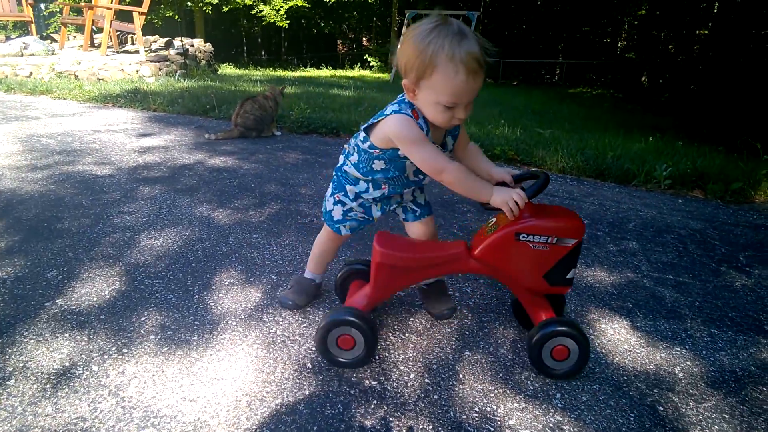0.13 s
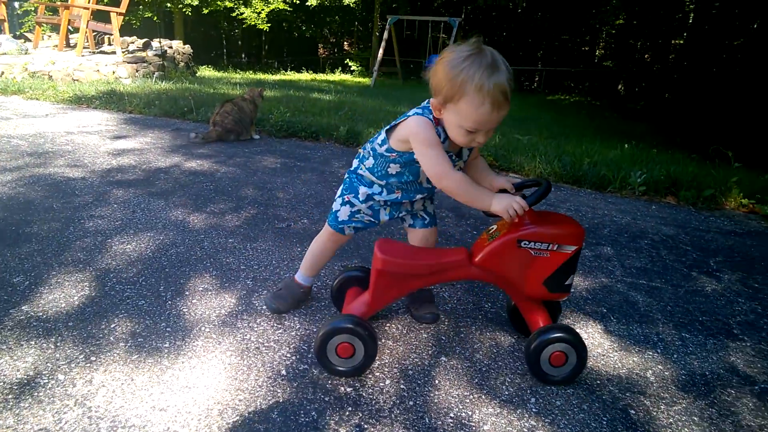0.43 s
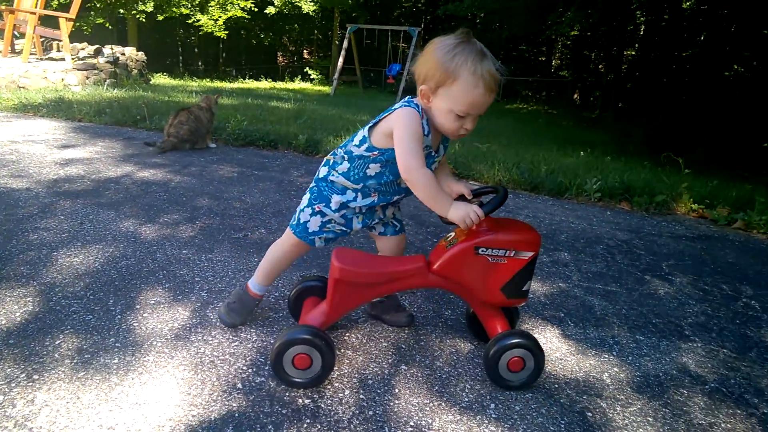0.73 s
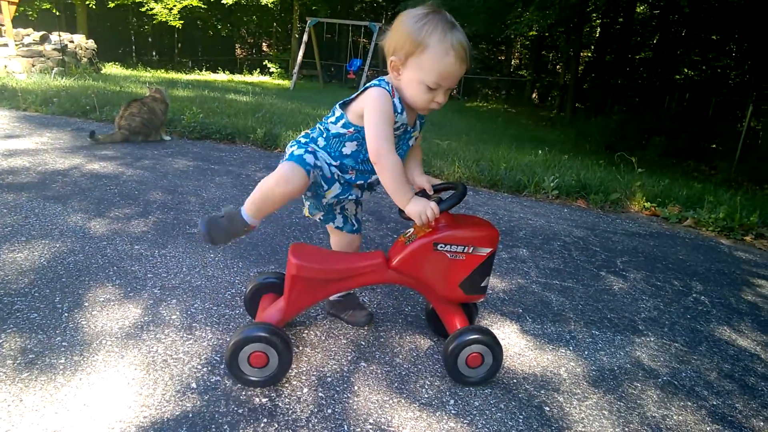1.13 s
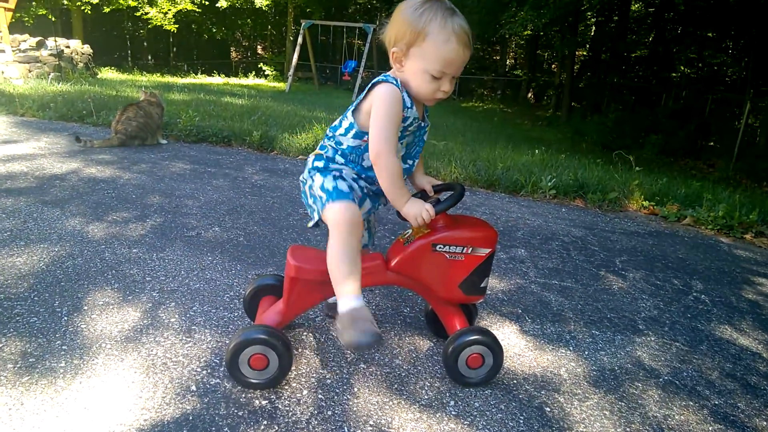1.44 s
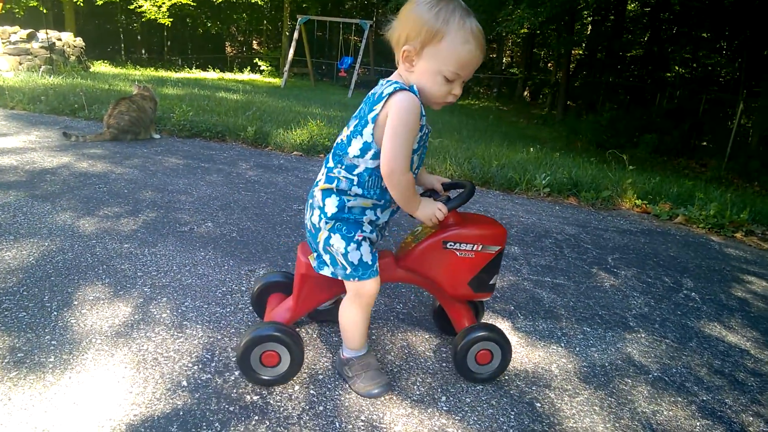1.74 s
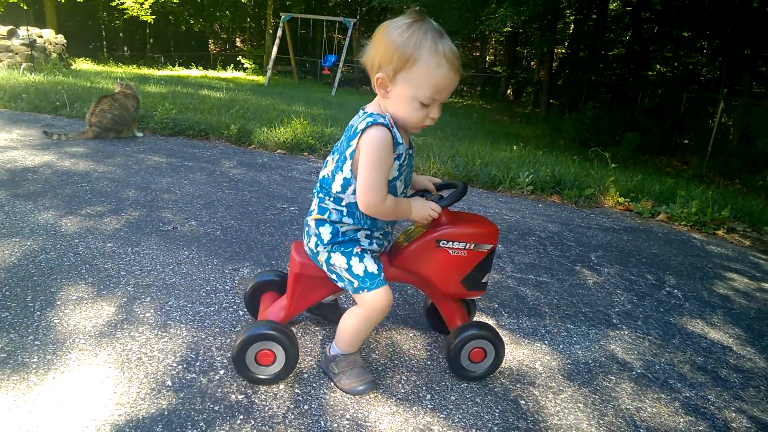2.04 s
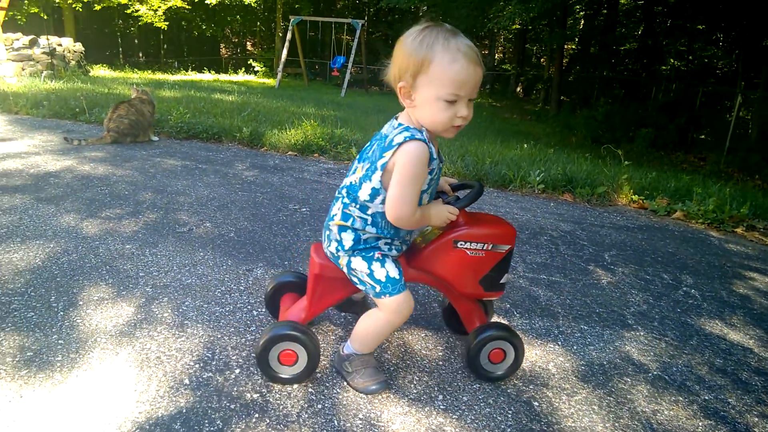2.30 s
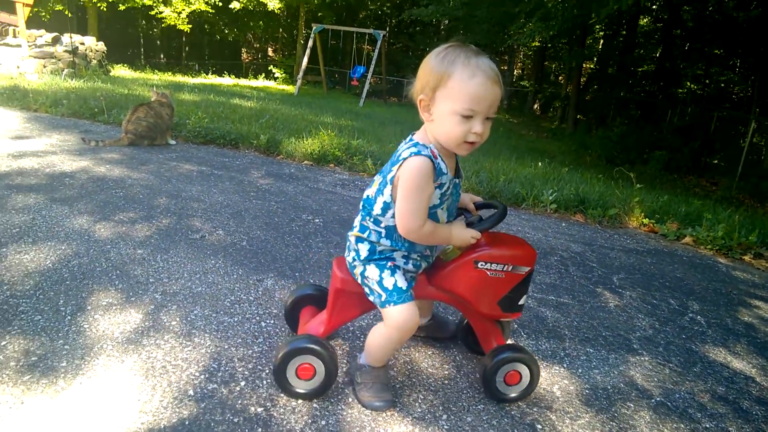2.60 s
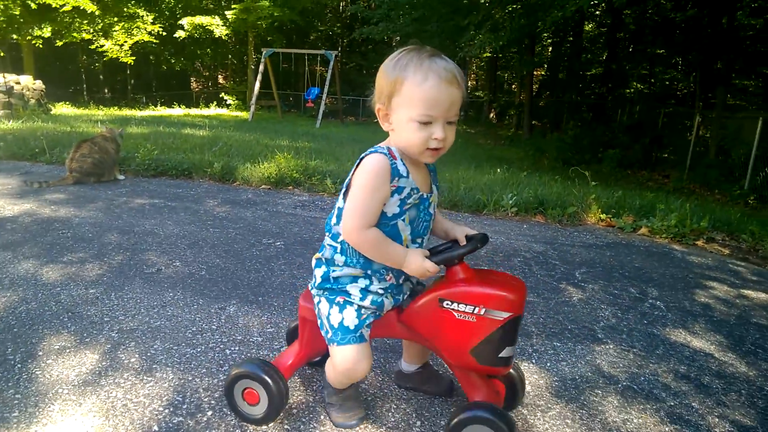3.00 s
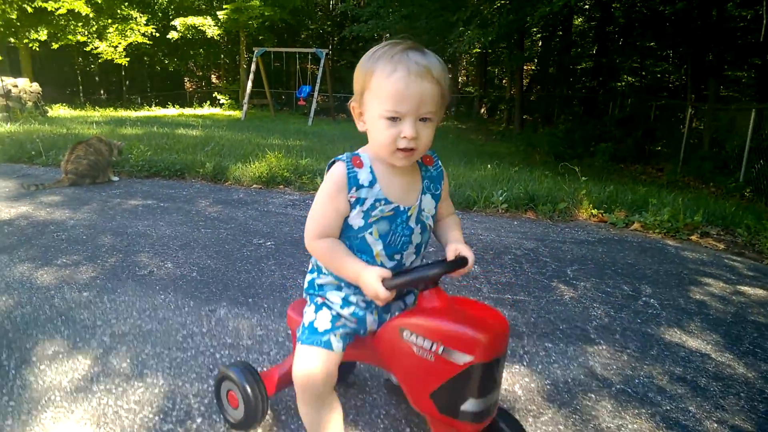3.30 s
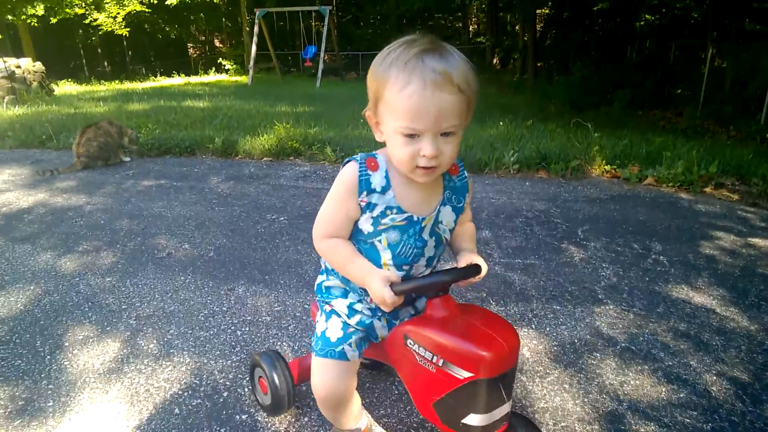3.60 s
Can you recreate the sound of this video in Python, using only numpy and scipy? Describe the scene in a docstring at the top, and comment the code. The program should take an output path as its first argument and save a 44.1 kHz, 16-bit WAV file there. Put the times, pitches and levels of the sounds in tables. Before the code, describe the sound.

Hard plastic wheels of a ride-on toy knock and crunch on asphalt close by at the start, then settle. Faint shoe and cloth scuffs follow, with a faint distant animal hoot near 0.9 seconds and a few clacks around 1.7. From 2.7 seconds the wheels roll loudly, crunching and rattling, with a short honking skid at 3.5 before easing off. The yard behind holds a faint low hum.

```python
"""Ride-on tractor on asphalt

Close by, a toddler climbs onto a hollow plastic tractor and pushes it over rough asphalt. Grit excites
the hard wheels, which crunch, scrape and knock on loose axles; the shell resonates with each knock.
Shoes and clothes rustle, and one wheel skids. The quiet yard holds a low hum and one far animal hoot."""
import sys
import numpy as np
from scipy import signal
from scipy.fft import rfft, irfft
from scipy.io import wavfile

SR = 44100
rng = np.random.default_rng(int(sys.argv[2]) if len(sys.argv) > 2 else 0)


def output_pcm(signal):
    """Save a mono or channel-first signal as 16-bit PCM at the path in sys.argv[1].

    Samples are clipped to [-1, 1] before scaling.
    """
    pcm = np.clip(np.atleast_2d(signal).T, -1, 1) * 32767
    wavfile.write(sys.argv[1], SR, np.round(pcm).astype(np.int16))


N = 165375
TIME = np.arange(N) / SR

# Overlapping surges of wheel noise as the toy creeps, starts rolling, rolls on and skids. Each row:
# peak, rise and fall times in seconds, relative levels in dB of rumble, crunch, scrape and wheel ring.
WHEEL_SURGES = [(0.06, 0.6, 0.095, -36, -35, -42, -59), (0.29, 0.46, 0.29, -49, -52.5, -61.5, -68),
                (1.71, 0.17, 0.12, -42, -40.5, -57.5, -59), (2.07, 0.56, 0.29, -53.5, -52.5, -66.5, -68),
                (2.69, 0.18, 0.28, -55, -67, -53, -50), (2.79, 0.017, 0.095, -28.5, -34, -33, -26.5),
                (2.89, 0.12, 0.26, -26.5, -18, -28.5, -28.5), (3.285, 0.032, 0.29, -31, -23.5, -35.5, -45),
                (3.418, 0.28, 0.2, -30, -23, -30.5, -27.5), (3.487, 0.04, 0.061, -18.5, -14.5, -28.5, -21),
                (3.68, 0.15, 0.18, -32.5, -28.5, -41.5, -32.5)]
# Modes of the hollow shell. Each row: frequency in Hz, gain in dB, 60 dB decay time in seconds.
SHELL_MODES = [(244.9, 1.5, 0.08), (328, -10.5, 0.05), (830, -5.5, 0.12), (1217, -5.5, .11),
               (1538, -4.5, 0.11)]
# Spectra of rolling, then of the outdoor air. Each row: frequency in Hz, relative level in dB.
RUMBLE_SPECTRUM = [(30, -47), (150, -14.5), (225, -1.5), (380, 3), (560, -8.5), (2000, -71.5)]
CRUNCH_SPECTRUM = [(200, -28), (500, -12), (720, 0.5), (1050, -4), (1750, -5), (2300, -19.5), (4000, -21.5),
                   (9000, -59.5)]
SCRAPE_SPECTRUM = [(500, -53), (1900, -6), (4000, -1), (6400, -5), (9000, -7.5), (16000, -21)]
AIR_SPECTRUM = [(20, 2.5), (113, 0), (216, -11.5), (446, -23), (624, -18), (6180, -25.5), (16000, -47)]
# Wheels striking their axles; the rows at 3.469 and 3.489 s are slips of the skidding wheel. Each row: # start
# in seconds, relative levels in dB of clack and boom, clack pitch in Hz.
AXLE_KNOCKS = [(0.053, -9.5, -32, 1246), (0.062, -10.5, -34, 1300), (0.087, -21, -37, 1350),
               (0.163, -22, -49, 735), (0.198, -33.5, -40.5, 822), (0.242, -41.5, -52.5, 720),
               (0.322, -40, -49.5, 1190), (0.368, -37.5, -62, 1360), (0.402, -41.5, -51, 775),
               (0.518, -41.5, -79, 960), (1.614, -34, -41.5, 1090), (1.628, -16.5, -31.5, 1680),
               (1.702, -24.5, -37.5, 1080), (1.721, -28, -43.5, 1200), (1.779, -36, -57.5, 1100),
               (2.414, -38.5, -43, 1210), (2.581, -37.5, -58, 1980), (2.729, -19.5, -30.5, 1310),
               (2.751, -18.5, -28.5, 1110), (2.819, -16, -33, 1350), (2.833, -9, -29.5, 1348),
               (2.868, -1, -30, 1520), (2.877, -5, -36, 1610), (2.891, -7.5, -58, 1410),
               (2.92, -8, -28.5, 1510), (2.951, -11, -36, 1430), (2.982, -8.5, -25.5, 1462),
               (3.011, -9.5, -28, 1490), (3.042, -12.5, -29.5, 1450), (3.058, -15, -27.5, 1420),
               (3.093, -12, -31.5, 1410), (3.108, -23, -33.5, 1250), (3.141, -11, -29, 1430),
               (3.188, -14, -35, 1370), (3.444, -12, -25.5, 1203), (3.469, -5, -26, 2450),
               (3.489, -2.5, -22, 893), (3.629, -16.5, -32.5, 1378), (3.704, -10.5, -26.5, 1438),
               (3.738, -14.5, -35, 1532)]
# Grit and plastic snapping against a wheel. Each row: start in seconds, relative level in dB.
GRIT_SNAPS = [(0.1605, -17.5), (0.169, -19.5), (0.1997, -22.5), (0.288, -31.5), (0.551, -44.5),
              (0.6377, -40), (1.0794, -37.5), (1.628, -26), (1.7019, -24.5), (1.88, -32), (1.9593, -30.5),
              (2.413, -25.5), (2.7845, -19.5), (2.8882, -15), (3.525, -6.5), (3.5388, -11.5), (3.5629, -15)]
# Shoe and cloth strokes. Each row: start and length in seconds, levels in dB of hiss and dull scrape.
SCUFF_STROKES = [(0.514, 0.2, -54, -55), (0.955, 0.42, -66, -93), (1.293, 0.15, -59.5, -95),
                 (2.13, 0.15, -57, -81)]
# Spectra of impacts and rubbing. Each row: frequency in Hz, relative level in dB.
CLACK_SPECTRUM = [(200, -23.5), (500, -10.5), (750, 0), (1650, -3), (2300, -10), (7000, -53)]
CRACK_SPECTRUM = [(600, -40), (1600, 2.5), (3600, 2), (8000, -23.5), (16000, -28.5)]
SNAP_SPECTRUM = [(500, -49), (2000, 5.5), (6000, 11.5), (10000, 1), (16000, -8)]
RUSTLE_SPECTRUM = [(400, -19.5), (3000, 3.5), (11000, -11.5), (16000, -25)]
# Modes of a wheel dragged sideways. Each row: frequency in Hz, relative gain in dB.
HONK_MODES = [(812, -4), (1215, 0.5), (1765, -10), (2608, -6), (3430, -10)]
# Stereo image. Each row: frequency in Hz, gain of the side signal in dB, left over right in dB.
STEREO_IMAGE = [(40, -1, 1), (130, -21, 0.6), (700, -18, 0.2), (1300, -11, 1.15), (4260, -4.5, 4),
                (8200, 2, 4), (14180, 5, 1)]

WHEEL_HZ = 2010


def amp(db):
    """Amplitude grows tenfold for every 20 dB."""
    return 10 ** (np.asarray(db) / 20)


def unit_rms(x):
    """Normalisation to unit mean power."""
    return x / np.sqrt(np.mean(x ** 2) + 1e-20)


def at_level(x, db, onset_samples=660):
    """Normalisation of an impact by the rms level of its onset."""
    return amp(db) * x / np.sqrt(np.mean(x[0, :onset_samples] ** 2))


def curve(points, hz, column=1):
    """Interpolation on a logarithmic frequency axis."""
    table = np.transpose(points)
    return np.interp(np.log(hz + 1), np.log(table[0] + 1), table[column])


def add(mix, start_s, sound):
    """Superposition: a sound adds to the mix from its start time."""
    part = mix[:, max(round(start_s * SR), 0):][:, :sound.shape[1]]
    part += sound[:, :part.shape[1]]


def colour(x, spectrum, size=2048):
    """Minimum-phase filtering imposes a spectrum causally."""
    log_gain = np.log(amp(curve(spectrum, abs(np.fft.fftfreq(size, 1 / SR)))))
    taps = np.fft.ifft(np.exp(np.conj(signal.hilbert(log_gain)))).real[:size // 2]
    return signal.fftconvolve(x, taps[None], axes=1)[:, :x.shape[1]]


def resonate(x, hz, width_hz):
    """A damped resonance of unit gain, whose pitch may move."""
    phasor = np.exp(2j * np.pi * np.cumsum(hz * np.ones(x.shape[1])) / SR)
    pole = np.exp(-np.pi * width_hz / SR)
    return 2 * (phasor * signal.lfilter([1 - pole], [1, -pole], x / phasor + 1e-18)).real


def wander(rate_hz):
    """Low-passed noise gives a random fluctuation of unit rms."""
    rolloff = 1 + (np.fft.rfftfreq(N, 1 / SR) / rate_hz) ** 4
    return unit_rms(irfft(rfft(rng.standard_normal(N)) / rolloff, N))


def swell(start_s, length_s):
    """A raised-cosine envelope rises and fades smoothly."""
    return np.sin(np.pi * np.clip((TIME - start_s) / length_s, 0, 1)) ** 2


def grit(per_s, spread_db=4):
    """Shot noise: independent tiny impacts of uneven size, as a middle and side pair."""
    sizes = amp(spread_db * np.minimum(rng.exponential(1, N), 4))
    hits = rng.random(N) < per_s / SR
    return sizes * hits * rng.choice([-1., 1.], (2, N))


def shell(force, panel_db=-3, panel_t60=0.04):
    """Modal response: the hollow body and its small panels add decaying tones to a force."""
    t = np.arange(SR // 5) / SR
    panels = [(hz, panel_db, panel_t60) for hz in rng.uniform(3200, 8500, size=9)]
    ring = sum(amp(db - 60 * t / t60) * np.cos(2 * np.pi * hz * t) * 2 * np.log(1000) / (t60 * SR)
               for hz, db, t60 in SHELL_MODES + panels)
    return force + signal.fftconvolve(force, ring[None], axes=1)[:, :force.shape[1]]


def stone_pings(per_s=1600, t60=0.03, low_hz=2200, high_hz=6600, count=30):
    """Free vibration: each pinched stone rings briefly at its own natural frequency."""
    t = np.arange(1500) / SR
    out = np.zeros((2, N))
    for hz in rng.uniform(low_hz, high_hz, count):
        ring = amp(-60 * t / t60) * np.sin(2 * np.pi * hz * t)
        out += signal.oaconvolve(grit(per_s / count, spread_db=4.5), ring[None], axes=1)[:, :N]
    return unit_rms(out)


def surge_envelopes(drop_db=20):
    """Surges grow and decay exponentially and add in power, giving a gain for each wheel layer."""
    power = np.zeros((4, N))
    for peak_s, rise_s, fall_s, *levels_db in WHEEL_SURGES:
        from_peak = np.maximum((peak_s - TIME) / rise_s, (TIME - peak_s) / fall_s)
        power += amp([db - drop_db * from_peak for db in levels_db]) ** 2
    return np.sqrt(power)


def rolling_wheels(flex_hz=35, width_hz=150, bump_db=1.07, bump_hz=55):
    """Forced vibration: grit drives shell and wheels; flexing shifts their ring, bumps vary the load."""
    stones = shell(grit(per_s=3500))
    sand = unit_rms(shell(grit(per_s=4500, spread_db=5))) + amp(-1) * stone_pings()
    rumble_gain, crunch_gain, scrape_gain, ring_gain = surge_envelopes()
    rumble = amp(-1) * rumble_gain * unit_rms(colour(stones, RUMBLE_SPECTRUM))
    crunch = amp(-1.5) * crunch_gain * unit_rms(colour(stones, CRUNCH_SPECTRUM))
    scrape = amp(1) * scrape_gain * unit_rms(colour(sand, SCRAPE_SPECTRUM))
    wheel_hz = WHEEL_HZ + flex_hz * wander(22)
    ring = ring_gain * unit_rms(resonate(resonate(stones, wheel_hz, width_hz), wheel_hz, 2 * width_hz))
    return (rumble + crunch + scrape + ring) * amp(bump_db * wander(bump_hz))


def yard(air_db=-60, swell_db=0.6, low_cut_hz=33, hum_hz=117.8, hum_db=-64, drift_hz=2, waver_db=3):
    """Ambient noise: faint broadband air and a low hum, randomly modulated in pitch and level."""
    hz = np.fft.rfftfreq(N, 1 / SR)
    low_cut = hz ** 2 / np.hypot(hz ** 2, low_cut_hz ** 2)
    air = irfft(rfft(rng.standard_normal((2, N))) * amp(curve(AIR_SPECTRUM, hz)) * low_cut, N)
    out = amp(air_db + swell_db * wander(7.2)) * unit_rms(air)
    cycles = np.cumsum(hum_hz + drift_hz * wander(3.4)) / SR
    out[0] += amp(hum_db + waver_db * wander(6.6)) * np.sqrt(2) * np.sin(2 * np.pi * cycles)
    return out


def impact(decay_s, chatter, tail_db, tail_t60):
    """Contact force: an impulse, a quickly dying chatter and a faint diffuse tail."""
    t = np.arange(SR // 5) / SR
    envelope = chatter * np.exp(-t / decay_s) + amp(tail_db - 60 * t / tail_t60)
    force = rng.standard_normal((2, len(t))) * envelope
    force[0, 0] += 1
    return force


def axle_knocks(chatter_s=0.004, lag_s=0.0005, boom_lag_s=0.0017, width_hz=480):
    """Impact excitation: a wheel drops on its axle with a crack and a clack, then the shell booms."""
    out = np.zeros((2, N))
    for (start_s, clack_db, boom_db, hz), looseness in zip(AXLE_KNOCKS, rng.random(len(AXLE_KNOCKS))):
        force = shell(impact(chatter_s * (1 + looseness), chatter=0.18, tail_db=-40, tail_t60=0.22))
        clack = colour(resonate(force, hz, width_hz) + amp(-8) * force, CLACK_SPECTRUM)
        crack = colour(force, CRACK_SPECTRUM)
        boom = colour(force, RUMBLE_SPECTRUM)
        add(out, start_s + lag_s, at_level(clack, clack_db - 10) + at_level(crack, clack_db - 22))
        add(out, start_s + lag_s + boom_lag_s, at_level(boom, boom_db - 1))
    return out


def grit_snaps(lag_s=0.0013, width_hz=35):
    """Brief contacts have broad spectra: pinched grit and plastic click and leave the wheel ringing."""
    out = np.zeros((2, N))
    for start_s, db in GRIT_SNAPS:
        click = colour(impact(decay_s=0.0016, chatter=0.33, tail_db=-30, tail_t60=0.18), SNAP_SPECTRUM)
        ring = amp(15) * resonate(click, WHEEL_HZ, width_hz)
        add(out, start_s + lag_s, at_level(click + ring, db - 20))
    return out


def scuffs():
    """Friction noise: shoes and cloth slide in short grainy strokes."""
    grains = grit(per_s=1500)
    hiss = unit_rms(colour(grains, RUSTLE_SPECTRUM))
    dull = unit_rms(colour(grains, CRUNCH_SPECTRUM))
    return sum(swell(start_s, length_s) * (amp(hiss_db) * hiss + amp(dull_db) * dull)
               for start_s, length_s, hiss_db, dull_db in SCUFF_STROKES)


def animal_hoot(start_s=0.825, length_s=0.135, top_hz=705, db=-53.5, bend=0.1, crest=0.39):
    """Modulation of a tone: a far hoot crests early in pitch, then falls; noise roughens both ends."""
    progress = np.clip((TIME - start_s) / length_s, 0, 1)
    arch = np.sin(np.pi * progress)
    cycles = np.cumsum(top_hz * (1 - bend * (2 * (progress - crest)) ** 2)) / SR
    roughness = amp(-5) * np.sqrt(abs(arch)) * (1 - arch ** 2 / 2) * wander(240)
    tone = (arch ** 2 + roughness) * np.sin(2 * np.pi * cycles)
    return np.array([amp(db) * np.sqrt(2) * tone, np.zeros(N)])


def wheel_skid(start_s=3.428, length_s=0.091, level_db=-13.5, width_hz=50):
    """Stick-slip friction: a wheel judders sideways, and its uneven slips make it honk and rattle."""
    slips = grit(per_s=1300)
    honk = sum(amp(db) * resonate(resonate(slips, hz, width_hz), hz, 2 * width_hz)
               for hz, db in HONK_MODES)
    rattle = colour(colour(slips, CRACK_SPECTRUM), CLACK_SPECTRUM)
    return amp(level_db) * swell(start_s, length_s) * (unit_rms(honk) + amp(-6) * unit_rms(rattle))


def scene(left_lag_s=2.2e-5):
    """Middle-side stereo: sum and difference give left and right; the treble is widest, the left lags."""
    sources = (rolling_wheels() + wheel_skid() + axle_knocks() + grit_snaps()
               + scuffs() + yard() + animal_hoot())
    middle, side = rfft(sources)
    hz = np.fft.rfftfreq(N, 1 / SR)
    side *= amp(curve(STEREO_IMAGE, hz))
    lean = amp(curve(STEREO_IMAGE, hz, column=2) / 2)
    delay = np.exp(-2j * np.pi * hz * left_lag_s)
    return irfft(np.array([(middle + side) * lean * delay, (middle - side) / lean]), N)


def record(dry, ceiling=1.0, cutoff_hz=16200):
    """Soft saturation rounds the loudest peaks; a low-pass filter then limits the band."""
    rounded = dry / (1 + (dry / ceiling) ** 4) ** (1 / 4)
    low_pass = signal.firwin(255, cutoff_hz, window=("kaiser", 9), fs=SR)
    return signal.oaconvolve(rounded, low_pass[None], "same")


dry = scene()
out = record(dry)
output_pcm(out)
```